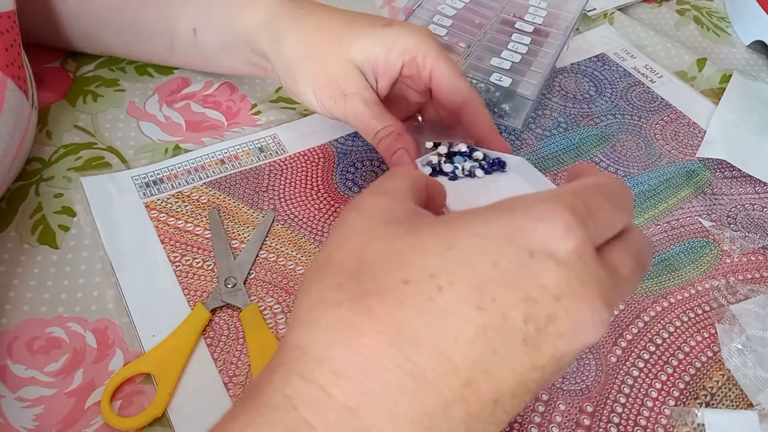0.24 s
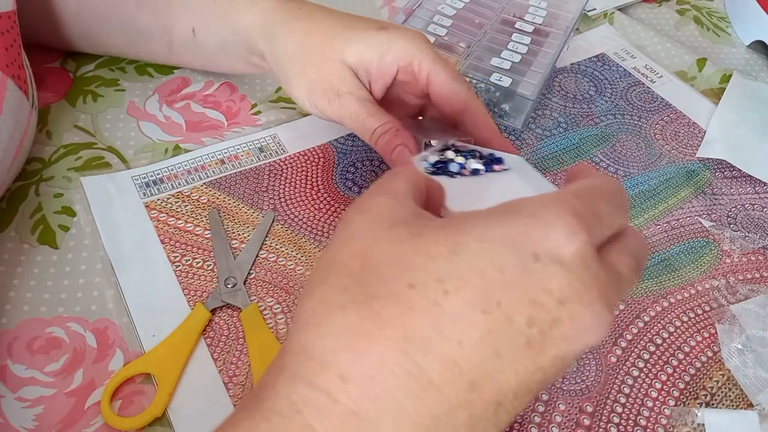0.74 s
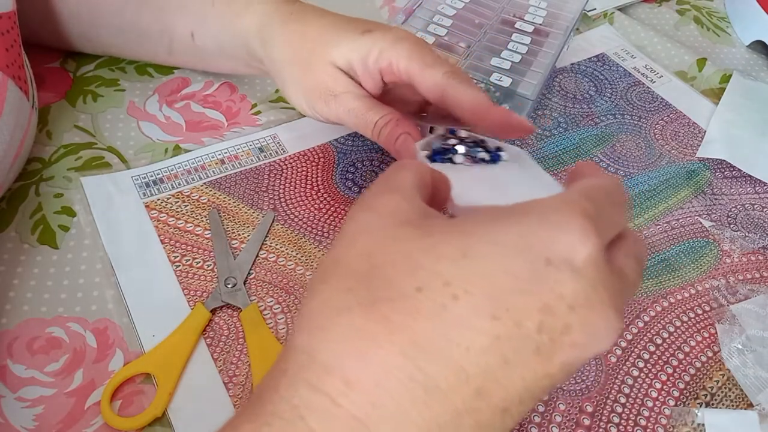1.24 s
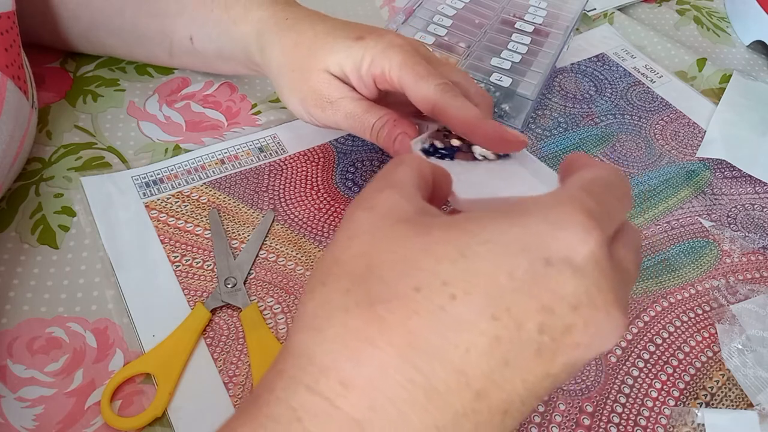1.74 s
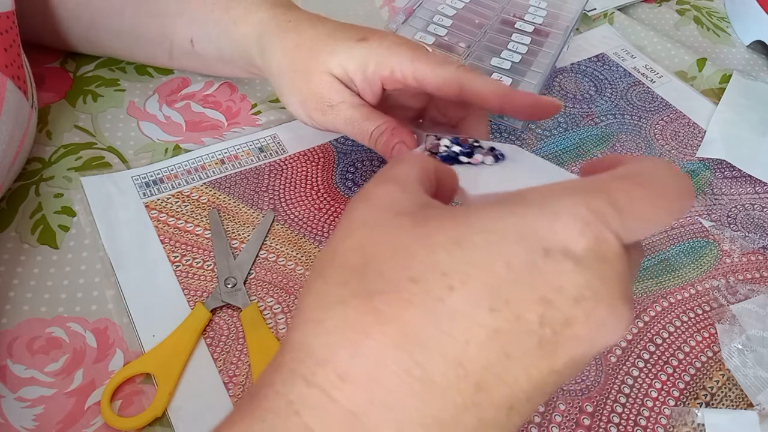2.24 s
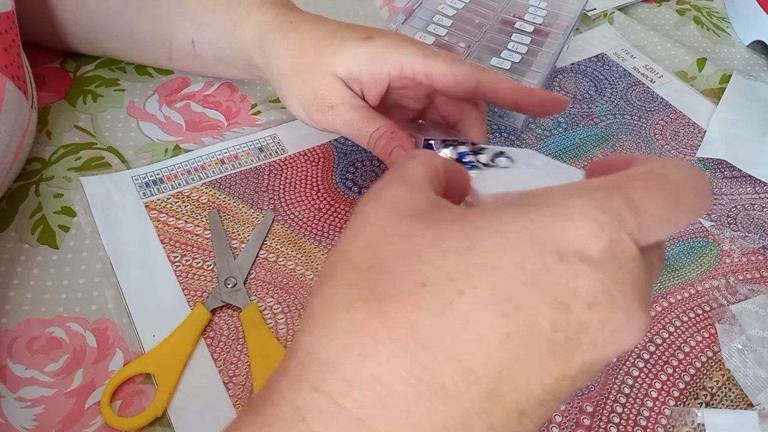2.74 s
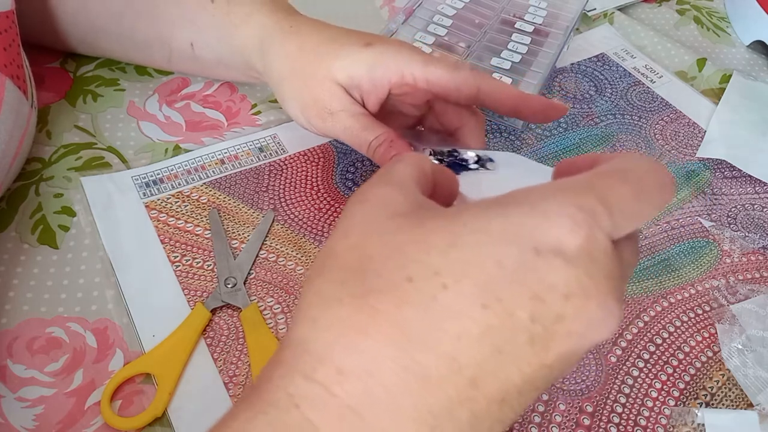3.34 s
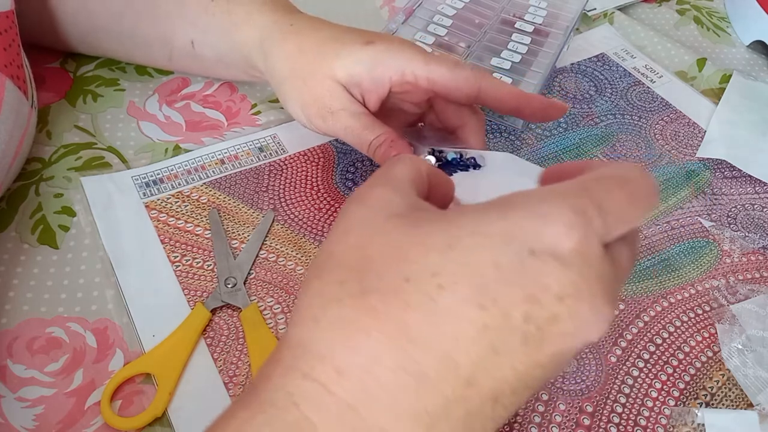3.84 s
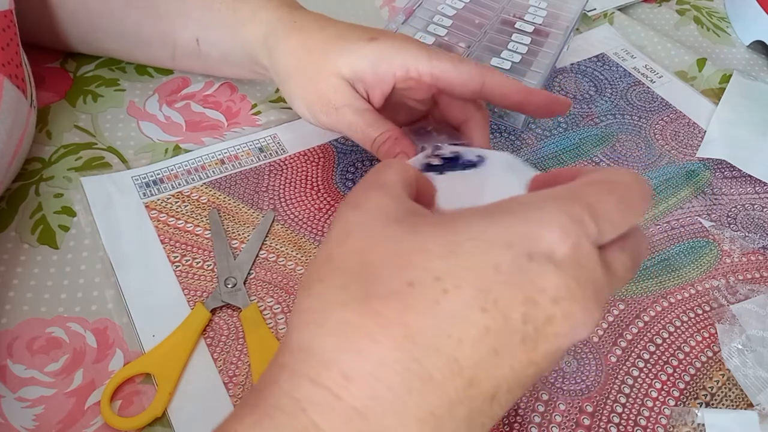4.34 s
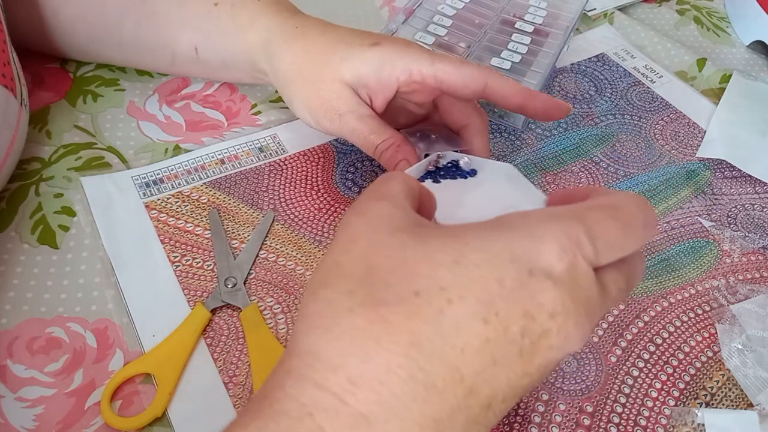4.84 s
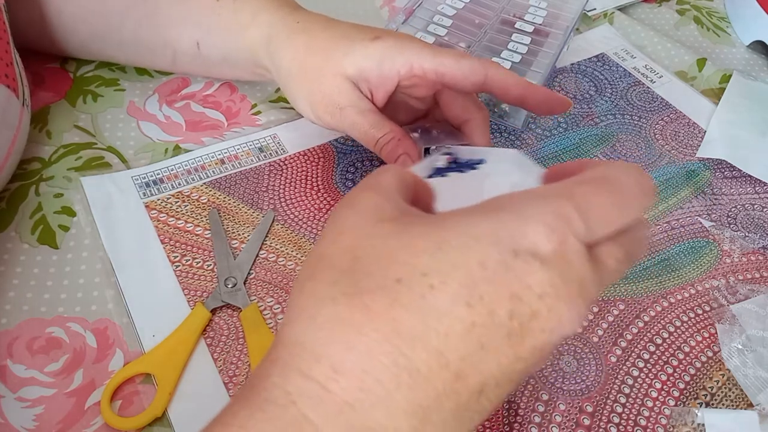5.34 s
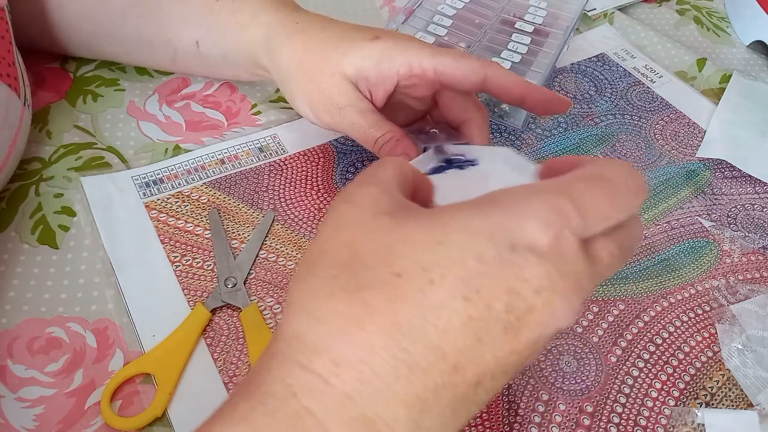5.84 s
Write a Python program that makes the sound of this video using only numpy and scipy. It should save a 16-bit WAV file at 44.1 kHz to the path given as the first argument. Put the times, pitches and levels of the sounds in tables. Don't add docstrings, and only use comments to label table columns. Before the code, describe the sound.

Close stereo sound of little beads rattling in a plastic tray at a table indoors. Quick uneven shakes give crisp, sandy bursts of high ticks over duller patter on the tray floor. A soft low thud of an arm on the table comes near two seconds, followed by the strongest rattles; later there are brief gritty scrapes and smaller shakes. Faint low house rumble and hiss lie underneath.

```python
import sys
import numpy as np
from scipy import signal
from scipy.fft import rfft, irfft
from scipy.io import wavfile
from scipy.ndimage import uniform_filter1d

SR = 44100
rng = np.random.default_rng(int(sys.argv[2]) if len(sys.argv) > 2 else 0)


def pcm_store(signal):
    levels = np.round(np.clip(np.atleast_2d(signal), -1, 1) * 32767)
    wavfile.write(sys.argv[1], SR, levels.astype(np.int16).T)


def volts_from_decibels(level):
    exponent = np.asarray(level, float) / 20
    return 10 ** exponent


N = 269010
TIME = np.arange(N) / SR


def level(x, db):
    return x * volts_from_decibels(db) / np.sqrt(np.mean(x ** 2))


def colour(x, points):
    hz, db = np.transpose(points)
    gain_db = np.interp(np.log(np.fft.rfftfreq(4096, 1 / SR) + 1), np.log(hz), db)
    cepstrum = irfft(np.maximum(gain_db, -70) * np.log(10) / 20)
    cepstrum[1:2048] *= 2
    cepstrum[2049:] = 0
    impulse = irfft(np.exp(rfft(cepstrum)))[None, :2048]
    return signal.fftconvolve(x, impulse, axes=1)[:, :N]


def held(step, spread):
    return spread * np.repeat(rng.standard_normal(N // step + 1), step)[:N]


def curves(rows):
    s, *columns = np.transpose(rows)
    return [np.interp(TIME, s, column) for column in columns]


def swarm(rate_hz, scatter_db, db, clump_db):
    hit = rng.random(N) < rate_hz / SR
    size_db = scatter_db * np.minimum(rng.exponential(size=N), 4)
    size = volts_from_decibels(size_db) * rng.choice([-1, 1], N)
    clump = uniform_filter1d(held(300, 1), size=300)
    return level(hit * size * volts_from_decibels(clump_db * clump), 0) * volts_from_decibels(db)


def train(rows, db):
    x = np.zeros(N)
    at = (np.array(rows)[:, 0] * SR).astype(int)
    np.add.at(x, np.minimum(at, N - 1), volts_from_decibels(db))
    return x


def spread(x, length_s):
    window = np.hanning(int(length_s * SR) + 3)
    grit = rng.choice([-1, 1], N)
    return signal.oaconvolve(x, window / np.sqrt(np.sum(window ** 2)), mode="same") * grit


def ring(x, modes, free_hz=None, damp_db=0):
    out = np.zeros((2, N))
    side = np.array([[1], [-1]])
    for hz, db, t60_s, pan_db, lead_rad in modes:
        push = x
        if free_hz is not None:
            push = x * volts_from_decibels(-damp_db * np.abs(np.log2(hz / free_hz)))
        pole = np.exp((2j * np.pi * hz - np.log(1000) / t60_s) / SR)
        z = signal.lfilter([1], [1, -pole], push)
        out = out + volts_from_decibels(db + side * pan_db / 2) * (z * np.exp(.5j * side * lead_rad)).imag
    return out


def soft(x, low_hz, high_hz):
    return signal.sosfilt(signal.butter(3, [low_hz, high_hz], "band", fs=SR, output="sos"), x)


# frequency in Hz, density in dB per Hz.
ROOM = [(35, -28.5), (60, 4), (189, -3), (301, -5.5), (427, -12.5), (666, -15), (749, -18.5), (1090, -18),
        (1220, -34), (1780, -28), (4030, -47), (8320, -24), (12000, -42), (16000, -60)]


def room():
    room_db = -78
    mid, side = colour(rng.standard_normal((2, N)), ROOM)
    rumble = [(35, -9.0), (60, 4.5), (110, 2.5), (170, -29.0)]  # (Hz, dB per Hz)
    deep, other = colour(rng.standard_normal((2, N)), rumble)
    deep = level(np.array([deep + 1.3 * other, deep - 0.18 * other]), room_db + 0.5)
    hiss = np.array([(mid + 1.36 * side) * volts_from_decibels(2.0), (mid - 0.62 * side) * volts_from_decibels(-0.5)])
    return deep + level(hiss, room_db + 6.0)


# time in seconds, rub along the rim in dB,
# dull bead-on-floor patter re ticks in dB, tray ring re ticks in dB.
GRIP = [(0, -82.5, -8.5, -23), (.5, -100, -9.5, -20.5), (1.0, -88, -8, -11), (1.5, -90, -14.5, -27),
        (2.1, -78.5, -5, -9), (2.5, -85, -8, -11), (2.9, -73.5, -5.5, -14.5), (3.4, -89, -7.5, -17.5),
        (3.9, -87, -2, -17.5), (4.5, -89, -10.5, -16.5), (4.94, -99, -7, -19), (5.4, -77.5, -2, -17),
        (5.74, -67.5, -4.5, -11), (6.1, -79, -1.5, -16)]


def ringing(s):
    grip = np.array(GRIP)
    return np.interp(s, grip[:, 0], grip[:, 3])


# time of the peak in seconds, tick level in dB, fade in ms per 10
# dB, tray ring re ticks in dB.
BACKS = [(0, -45.5, 32, -15), (0.053, -46, 33, -27), (0.145, -58.5, 32, -7.5), (.293, -55.5, 26, -16),
         (.759, -56, 4, -26.5), (1.213, -54, 28, -2), (1.304, -51.5, 10, -20), (1.425, -54, 20.5, -19.5),
         (1.597, -56.5, 35, -11), (1.747, -61, 14, -24), (1.824, -58, 21, -16.5), (1.915, -51, 36, -17),
         (2.879, -47, 59, -8), (3.003, -56.5, 40, -1), (3.105, -52, 47, -4), (3.147, -51.5, 32, -11),
         (3.231, -50, 28, -11), (3.41, -47.5, 30, -15.5), (3.448, -56, 30, -13.5), (4.124, -49, 38, -13.5),
         (4.204, -50, 12, -5.5), (4.296, -52.5, 20, -16), (4.516, -60, 69, -20), (4.892, -62.5, 18.5, -19),
         (5.189, -58, 19, -11), (5.312, -54, 35, -21), (5.556, -48.5, 32, -13.5), (5.65, -55, 64, -15),
         (5.848, -49.5, 37, -19), (5.963, -53, 31, -11)]
# time of the knock in seconds, tick level in dB, fade in ms per
# 10 dB, knock in dB.
LANDS = [(.176, -43.5, 30, -65), (.327, -43, 29.5, -63), (.491, -46.5, 68, -68), (.798, -47, 53, -65.5),
         (.957, -46, 52, -83), (1.122, -43, 23, -68), (1.455, -49.5, 36, -72), (1.932, -46.5, 53, -70),
         (2.076, -50.5, 14, -69), (2.219, -44, 33, -60), (2.384, -44.5, 18, -64.5),
         (2.523, -44.5, 80, -64.5), (2.687, -38.5, 73, -62.5), (3.024, -50, 38, -88), (3.172, -43, 12, -70),
         (3.334, -43.5, 20, -69), (3.501, -44.5, 65, -72), (3.67, -45, 67, -69), (3.848, -41, 46, -62),
         (4.035, -41, 35, -60), (4.211, -41, 28, -69), (4.381, -46.5, 47, -59.5), (4.562, -51, 11, -71),
         (4.984, -55, 48, -69.5), (5.073, -52.5, 30, -71.5), (5.232, -49.5, 28, -67),
         (5.393, -41.5, 15, -65.5), (5.731, -48, 37, -64.5), (5.879, -41, 23, -54), (6.039, -47.5, 45, -70)]
# time of the peak in seconds, tick level in dB, fade in ms
# per 10 dB, first bead re ticks in dB.
STIRS = [(.2386, -49, 45, 10), (.4271, -53.5, 68, 8), (.6025, -56, 22, 16), (0.6513, -59.5, 15, 17.5),
         (.7284, -64.5, 13, 13.5), (0.9013, -54.5, 37, 14.5), (1.065, -60.5, 28, 11.5),
         (1.2756, -62, 35, 15.5), (1.3671, -63.5, 7, -12), (1.626, -54, 24, 14), (1.7813, -58.5, 43, 14),
         (2.0303, -56.5, 38, -7), (2.1257, -60.5, 99, 13.5), (2.2974, -48, 109, 13),
         (2.6304, -49.5, 82, -10), (2.774, -58, 35, 23), (2.8343, -56, 36, 17), (3.2765, -62.5, 42, 20.5),
         (3.589, -47.5, 11, 4), (3.7475, -49, 38, 4), (3.94, -47, 37, 6), (4.3264, -57, 40, -1),
         (4.6004, -69.5, 121, 21), (4.742, -54.5, 23.5, -12), (5.1361, -55.5, 64, 13),
         (5.4433, -52.5, 63, 2), (5.516, -49, -2, -8), (5.6144, -57, 13, 13), (5.7903, -52.5, 26, 2),
         (5.904, -59, 11, 14)]


def sloshes():
    land_peak_s, land_swell_ms = 0.012, 19.7
    back_swell_re_fade = 0.97
    stir_swell_ms, drop_swell_ms, stir_tray_db = 29.5, 9, 4
    slide_lead_s = 0.0097
    land, back, stir = np.transpose(LANDS), np.transpose(BACKS), np.transpose(STIRS)
    s = np.r_[land[0] + land_peak_s, back[0], stir[0]]
    db = np.r_[land[1], back[1], stir[1]]
    fade_ms = np.r_[land[2], back[2], stir[2]]
    stir_ms = np.where(stir[3] > 8, drop_swell_ms, stir_swell_ms)
    swell_ms = np.r_[np.full(len(LANDS), land_swell_ms), back_swell_re_fade * back[2], stir_ms]
    tray_db = np.r_[ringing(land[0]), back[3], ringing(stir[0]) + stir_tray_db]

    coarse = TIME[::44]
    ms = (coarse[:, None] - s) * 1000
    rise = -ms / np.maximum(swell_ms, 2)
    fall = ms / np.maximum(fade_ms, 2)
    power = volts_from_decibels(db - 10 * np.where(ms < 0, rise, fall)) ** 2
    tick_power = power.sum(axis=1)
    tray_power = power @ volts_from_decibels(tray_db) ** 2
    tick_db = np.interp(TIME, coarse, 10 * np.log10(tick_power + 1e-14))
    tray_db = np.interp(TIME + slide_lead_s, coarse, 10 * np.log10(tray_power + 1e-14))
    return tick_db, tray_db


# time in
# seconds, peak in dB, pitch in Hz.
MORE_CLICKS = [(0.023, -36, 9300), (0.044, -28, 10400), (0.099, -39, 9100), (0.138, -30, 8300),
               (0.3279, -33, 9300), (0.3848, -41, 9800), (0.508, -28, 10200), (0.5523, -34, 10100),
               (0.631, -48, 9200), (0.7532, -43, 9800), (0.758, -41, 8400), (1.2154, -44, 10700),
               (1.366, -51, 8300), (1.8212, -40.5, 8600), (1.915, -39, 9500), (1.946, -38, 10400),
               (2.0308, -41, 9500), (2.2308, -28, 9400), (2.4033, -26.5, 10170), (2.6284, -42, 12900),
               (2.7013, -22, 10400), (2.7085, -26, 8700), (2.778, -28.5, 11400), (2.9295, -35, 9600),
               (3.115, -31, 9300), (3.184, -30, 10400), (3.3903, -32, 11300), (3.5179, -26, 9900),
               (3.7494, -35, 9600), (3.8135, -34, 11560), (3.85, -33, 9500), (3.8543, -32, 10700),
               (3.8588, -25.5, 10000), (3.8893, -31, 9500), (3.9405, -31, 11500), (3.9454, -28, 10400),
               (3.954, -26, 11300), (3.969, -32, 10500), (4.0513, -23, 9100), (4.0728, -36, 10200),
               (4.152, -40, 11700), (4.2, -27, 9100), (4.2981, -44, 10200), (4.3274, -41, 10100),
               (4.6196, -48, 9100), (4.743, -41, 8700), (4.872, -50, 9600), (5.1471, -36, 11400),
               (5.2379, -26, 9400), (5.364, -45, 11000), (5.4008, -35, 8840), (5.4137, -38, 9200),
               (5.4432, -38, 8700), (5.5142, -28, 6300), (5.7379, -47, 10500), (5.751, -43, 9500),
               (5.7883, -36, 12600), (5.8513, -39, 11000), (5.9032, -32, 9600), (6.0488, -35, 9500)]
# time in seconds, peak in dB, pitch in Hz.
CLICKS = [(.124, -45, 9800), (.1427, -28.5, 8400), (.2195, -45, 8500), (.2671, -39.5, 8600),
          (.292, -48, 9500), (.3355, -39, 9000), (.364, -38.5, 9000), (.3755, -43, 8500),
          (.4584, -44.5, 8400), (.569, -42, 8000), (.579, -55, 8500), (2.7435, -40, 9500),
          (2.872, -38, 9500), (3.9325, -37.5, 9500), (4.567, -46, 9000), (.5469, -41, 10200),
          (.8576, -45, 9700), (1.178, -62, 10900), (1.4855, -43.5, 9500), (1.813, -48, 9200),
          (1.844, -51, 9900), (1.8719, -43, 9200), (2.3575, -55, 8700), (2.8858, -44, 9200),
          (2.9146, -39.5, 8700), (3.1016, -42.5, 11400), (3.4158, -41, 10500), (3.7891, -41.5, 9300),
          (3.8364, -40, 11400), (3.904, -44, 10600), (4.2075, -32, 9500), (4.411, -38, 11600),
          (4.4197, -36, 10800), (4.4851, -48, 11200), (4.683, -50.5, 9500), (4.8589, -60, 8600),
          (4.958, -58, 8700), (5.8093, -41.5, 9600), (5.8376, -50, 7000), (5.9122, -37.5, 9300)]
# time in seconds, peak in dB.
CRACKS = [(0.965, -30), (1.1314, -39), (1.466, -38), (1.9417, -32), (2.086, -37.5), (2.2275, -29),
          (2.394, -30.5), (2.699, -32.5), (3.032, -39), (3.34, -40), (3.5118, -31.5), (3.6764, -37.5),
          (3.862, -35), (4.0447, -31), (4.2218, -38), (4.3865, -40), (4.573, -40.5), (4.99, -38.5),
          (5.0752, -38), (5.0845, -43.5), (5.2413, -39), (5.882, -38)]


def lone_clicks(bead_hz):
    stir, crack = np.transpose(STIRS), np.transpose(CRACKS)
    s = np.r_[crack[0], stir[0]]
    db = np.r_[crack[1], stir[1] + stir[3]]
    hz = np.sqrt(8890 * bead_hz[(s * SR).astype(int)])
    more_clicks = np.array(MORE_CLICKS) + [0, -9.5, 0]
    return np.r_[CLICKS, more_clicks, np.c_[s, db, hz]]


def pitch_at(rows, elsewhere_hz):
    hz, rows = elsewhere_hz.copy(), np.array(rows)
    hz[(rows[:, 0] * SR).astype(int)] = rows[:, 2]
    return hz


def paths(x, hz, count, shared, bump_db):
    t = np.arange(1024) / SR
    kinds_hz = np.repeat(np.geomspace(5500, 14500, count), 2)
    tick = (1 - np.exp(-t / .0001)) * np.exp(-t / .00055)
    shape = tick + volts_from_decibels(-21) * np.exp(-t / .008)
    borders_hz = np.sqrt(kinds_hz[2::2] * kinds_hz[:-2:2])
    kind = 2 * np.digitize(hz, borders_hz) + rng.integers(0, 2, N)
    common = rng.standard_normal(len(t))
    common = np.array([common, np.roll(common, 1)])
    share = np.clip(shared, 0, 1)
    out = 0
    for k, centre_hz in enumerate(kinds_hz):
        way = np.sqrt(share) * common + np.sqrt(1 - share) * rng.standard_normal((2, len(t)))
        way = way + volts_from_decibels(bump_db) * signal.lfilter(*signal.iirpeak(centre_hz, 3.5, fs=SR), way)
        way = way * shape / np.sqrt(np.sum((way * shape) ** 2, axis=1, keepdims=True))
        out = out + signal.oaconvolve((x * (kind == k))[None], way, axes=1)[:, :N]
    return out


FLOOR_HZ = (2160, 3080, 4030, 4690, 6700)


def shifting(x):
    out = 0
    for hz in FLOOR_HZ:
        drift = uniform_filter1d(held(2600, 1.2), size=2000)
        out = out + volts_from_decibels(3.5 * drift) * signal.lfilter(*signal.iirpeak(hz, 3.5, fs=SR), x)
    return out


# frequency in Hz, density in dB per Hz.
TICK = [(2820, -23), (4800, -6.5), (7000, -6.5), (7300, -7.5), (7900, 0.5), (9190, 1), (10200, -3.5),
        (13900, 0), (15400, 2), (16000, -13)]
# frequency in Hz, density in dB per Hz.
PATTER = [(1290, -15), (2200, -0.5), (2510, 0.5), (2710, -9), (3040, 0), (3700, -2.5), (5000, -1.5),
          (6500, -13.5), (11000, -120)]


def bead_ticks(tick_db, patter_db):
    crowd = swarm(1300, 3.3, tick_db, clump_db=.8)
    bead_hz = 9000 * 2 ** (held(700, .25) + held(1, .22))
    clicks = lone_clicks(bead_hz)
    hits = crowd * volts_from_decibels(-2.0) + train(clicks, clicks[:, 1] + 14.9)
    hits = paths(hits, pitch_at(clicks, bead_hz), count=8, shared=.15, bump_db=11)
    skids = swarm(700, 2.5, tick_db + 1.5, clump_db=3)
    skids = paths(skids, bead_hz, count=2, shared=.3, bump_db=-20)
    patter = shifting(colour(hits + skids, PATTER))
    return colour(hits, TICK) * volts_from_decibels(7.0) + patter * volts_from_decibels(patter_db + 0.9)


# time in seconds, peak in dB, favoured ring in Hz.
KNOCKS = [(0.056, -45, 1900), (0.1382, -46, 1710), (0.1785, -53, 1700), (0.3499, -49, 1700),
          (0.5455, -46.5, 1820), (0.7277, -69, 1700), (0.8158, -49, 1810), (0.8939, -52, 1730),
          (0.9521, -46, 1720), (1.1333, -40, 1580), (1.5503, -52, 1670), (2.004, -39.5, 1670),
          (2.054, -47, 1600), (2.087, -47, 1560), (2.2194, -54, 1560), (2.378, -38, 1560),
          (2.513, -40, 1680), (2.5224, -42, 1570), (2.6783, -34.5, 1710), (2.7126, -43, 1720),
          (2.8726, -41, 1640), (3.152, -42, 1730), (3.1724, -46, 1700), (3.5027, -39, 1600),
          (3.8463, -45, 1700), (4.029, -41.5, 1700), (4.2047, -39.5, 1810), (4.2992, -49, 1700),
          (4.362, -50, 1700), (4.3856, -40.5, 1570), (4.743, -48, 1730), (4.9905, -48, 1710),
          (5.0738, -47, 1700), (5.0824, -46, 1720), (5.1701, -43, 1820), (5.2397, -45.5, 1590),
          (5.3344, -54.5, 1680), (5.3982, -41, 1620), (5.514, -50, 1600), (5.555, -50, 1580),
          (5.6595, -43.5, 1600), (5.7373, -43, 1800), (5.8098, -44, 1700), (5.8804, -37.5, 1750),
          (5.888, -53, 1900)]


def floor_knocks(struck_hz):
    knock_s = 0.0048
    hz, half = struck_hz.copy(), int(knock_s * SR)
    for s, _, ring_hz in KNOCKS:
        at = int(s * SR)
        hz[at - half:at + half] = ring_hz
    blows = train(KNOCKS, np.array(KNOCKS)[:, 1] - 5)
    return spread(blows, knock_s), hz


# time in seconds, peak in dB.
TAPS = [(.2389, -57), (.8051, -58), (.4296, -48), (1.0576, -44.5), (1.1999, -45.5), (1.367, -54.5),
        (1.417, -49), (1.515, -55.5), (1.592, -48), (1.746, -50.5), (1.894, -43.5), (1.906, -40),
        (2.134, -52), (2.144, -46), (2.155, -42.5), (2.162, -47), (2.1978, -45), (2.209, -51),
        (2.295, -57.5), (2.318, -46), (2.366, -46), (2.385, -58), (2.3044, -49.5), (2.421, -48),
        (2.5858, -38), (2.6069, -39), (2.6578, -37.5), (2.7537, -40.5), (2.7783, -39.5), (2.8469, -48),
        (3.0967, -41), (3.5775, -43), (3.6583, -38.5), (5.4634, -44), (5.525, -50), (5.7218, -45),
        (5.8512, -40)]


def floor_taps():
    land = np.transpose(LANDS)
    landing_db = land[1] + ringing(land[0]) + 4.5
    drops = np.r_[TAPS, np.c_[land[0], landing_db]]
    return spread(train(drops, drops[:, 1] - 1.5), 0.009)


# frequency in Hz, level in dB, t60 in seconds, left minus right in dB,
# left lead in radians.
TRAY = [(1264, -8, 0.035, -15, 0.36), (1422, -15, 0.095, 6.5, 0.87), (1545, -21.5, 0.048, -17.5, 3.9),
        (1522, -2.5, 0.026, 14.5, 1.27), (1681.6, -2.5, 0.018, 21, 0.25), (1787, -15.5, 0.019, -4, 0.47),
        (1842, -13, 0.049, -17.5, 3.5), (2238, -0.5, 0.033, 0.5, 2.9), (2300, -22, 0.029, 18, 7.5)]


def tray_ring(tray_db):
    taps = swarm(600., 2.5, tray_db, clump_db=1.0) * volts_from_decibels(-15.5) + floor_taps()
    struck_hz = 1680 * 2 ** (held(1500, .12) + held(1, .06))
    blows, struck_hz = floor_knocks(struck_hz)
    return soft(ring(taps + blows, TRAY, struck_hz, damp_db=26), 1444, 3070)


# frequency in Hz, level in dB, t60 in seconds, left minus right in dB,
# left lead in radians.
RIM = [(693, -4, 0.13, -2, 0.63), (749, 6, 0.1, 6, 0.67), (847, 12, 0.03, -9.5, 0.1),
       (1036, 2, 0.093, 10, -2.2), (1285, 1.5, 0.17, 31, -0.44)]


def rim_knocks(rim_db):
    rub = swarm(700., 3.9, rim_db, clump_db=-3.0) * volts_from_decibels(-34.5)
    knocks = spread(train(LANDS, np.array(LANDS)[:, 3] - 6.5), 0.0044)
    free_hz = 900 * 2 ** held(500, .25)
    return soft(ring(rub + knocks, RIM, free_hz, damp_db=8), 440, 1800)


def echoes(x, db, t60_s):
    t = np.arange(3000) / SR
    tail = rng.standard_normal((2, len(t))) * volts_from_decibels(-60 * t / t60_s)
    tail = tail * volts_from_decibels(db) / np.sqrt(np.sum(tail ** 2, axis=1, keepdims=True))
    return x + signal.oaconvolve(x, tail, axes=1)[:, :N]


def beads():
    tick_db, tray_db = sloshes()
    rim_db, patter_db, _ = curves(GRIP)
    ticks = bead_ticks(tick_db, patter_db)
    body = tray_ring(tray_db) + rim_knocks(rim_db)
    return ticks + echoes(body, db=-4.5, t60_s=0.13)


# centre in seconds, length in seconds, pitch in Hz, level in dB,
# width in Hz.
RUBS = [
    (0.35, 0.046, 1180, -71, 250),
    (3.156, 0.12, 960, -69, 350),
    (3.912, 0.14, 2510, -54.5, 500),
    (4.733, 0.034, 3950, -66, 250),
    (5.51, 0.12, 2980, -57, 453),
    (5.484, 0.079, 6000, -60, 800),
    (5.62, 0.34, 1290, -77, 600),
    (5.75, 0.056, 4360, -63, 300),
]


def rubs():
    grit = swarm(900, 2, 0, clump_db=2) + .6 * rng.standard_normal((2, N))
    out = 0
    for s, length_s, hz, db, width_hz in RUBS:
        swell = np.cos(np.pi * np.clip((TIME - s) / length_s, -.5, .5))
        ridge = signal.iirpeak(hz, hz / width_hz, fs=SR)
        scrape = signal.lfilter(*ridge, signal.lfilter(*ridge, grit))
        out = out + volts_from_decibels(db) * swell * level(scrape, 0)
    return out


# time in seconds, level in dB.
THUD = [
    (1.859, -75),
    (1.925, -53),
    (2.015, -55.5),
    (2.07, -74),
]


def thud():
    s, db = np.transpose(THUD)
    # Hz, dB, t60 s, left minus right dB, left lead rad
    table = [(68, 0, .2, 0, .5), (66, -3, .35, 0, .5), (125, -6, .12, 1, -.5), (235, -20, .1, 1, .5)]
    hum = level(soft(ring(rng.standard_normal(N), table), 52, 180), -0.16)
    return hum * volts_from_decibels(np.interp(TIME, s, db, left=-120, right=-120))


def scene():
    return beads() + rubs() + thud() + room()


def band_limit(x):
    return signal.sosfilt(signal.butter(12, 17070, fs=SR, output="sos"), x)


def record(dry):
    dry = dry * volts_from_decibels(np.array([[-.4], [.4]]))
    low_pass = signal.ellip(8, .2, 30, 15800, fs=SR, output="sos")
    return band_limit(signal.sosfilt(low_pass, dry))


dry = scene()
out = record(dry)
pcm_store(out)
```